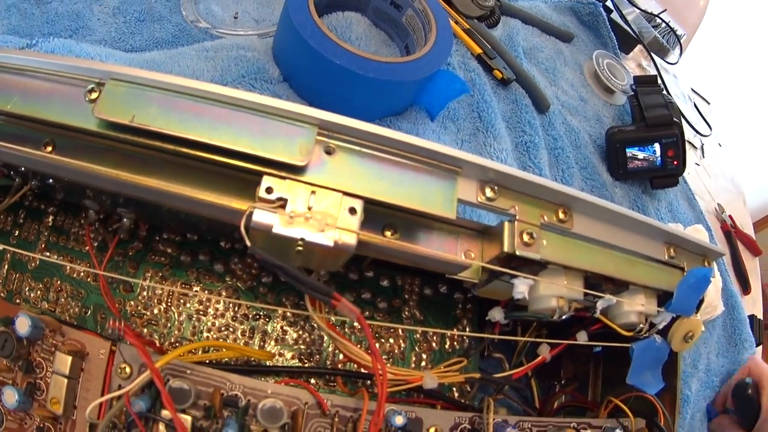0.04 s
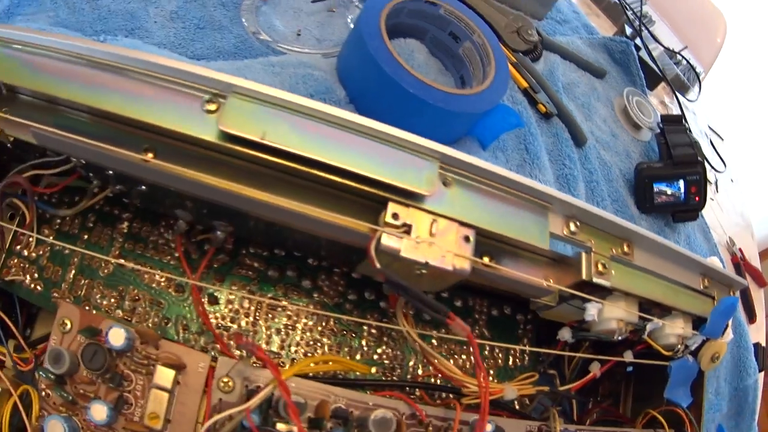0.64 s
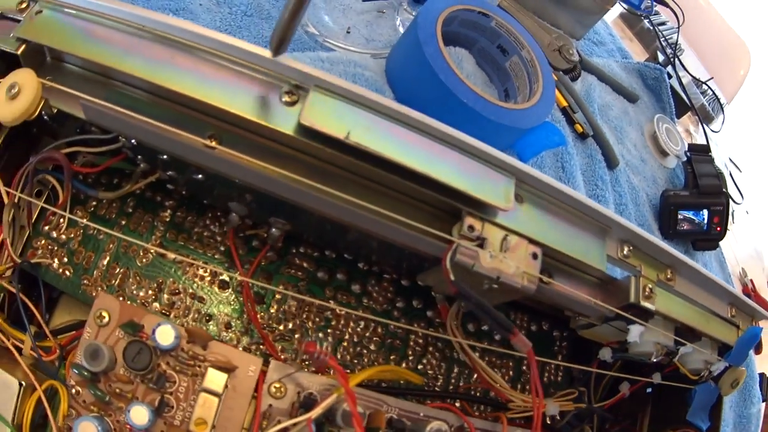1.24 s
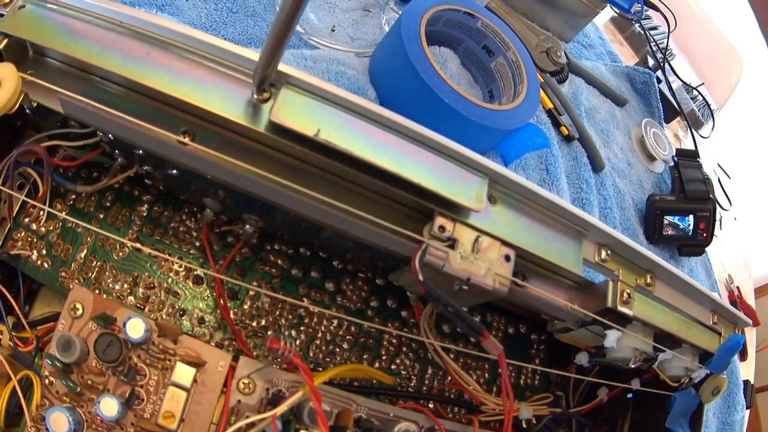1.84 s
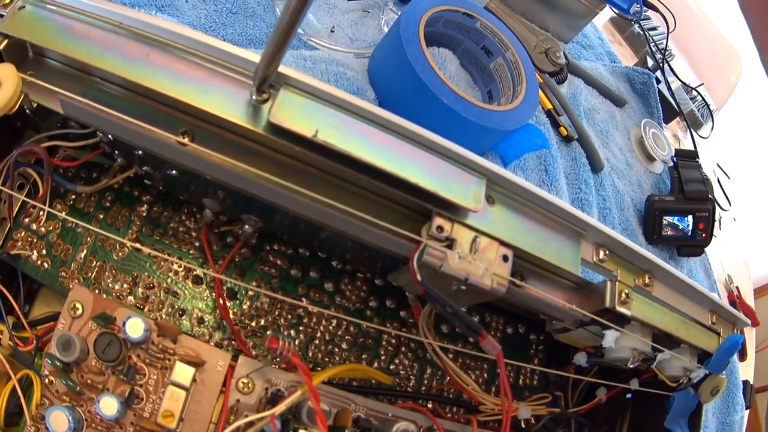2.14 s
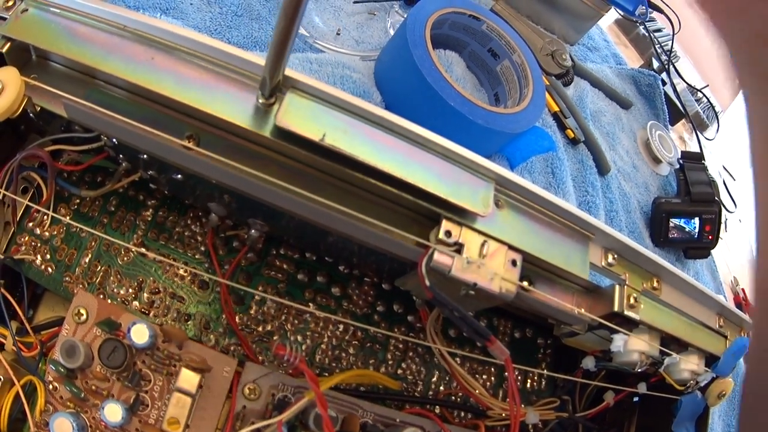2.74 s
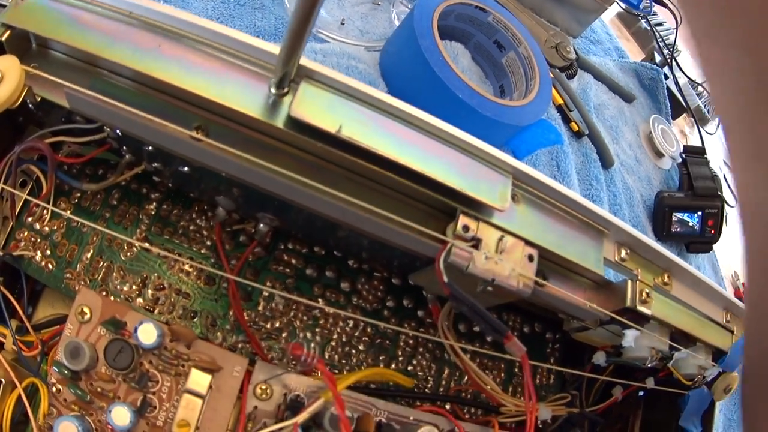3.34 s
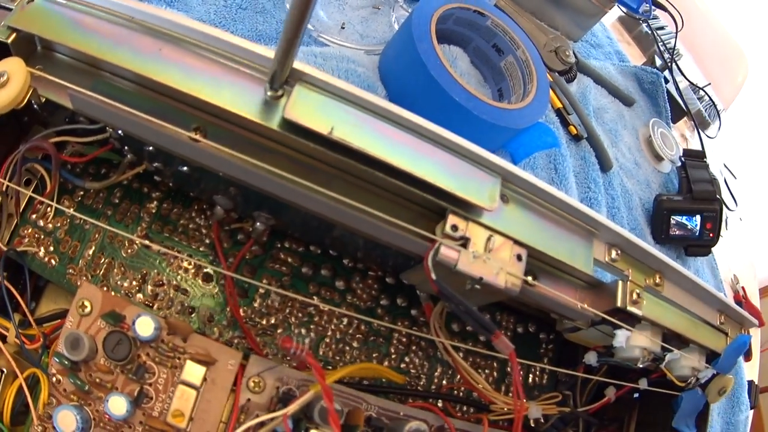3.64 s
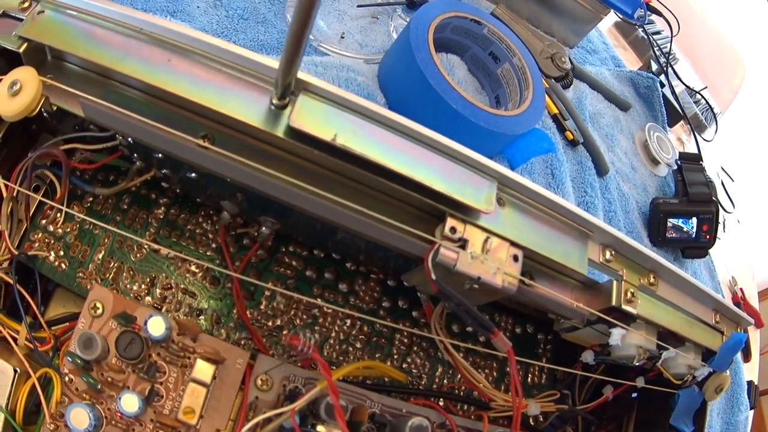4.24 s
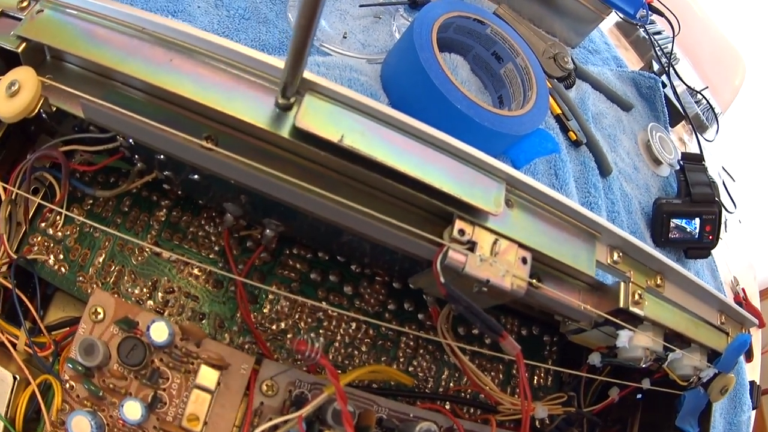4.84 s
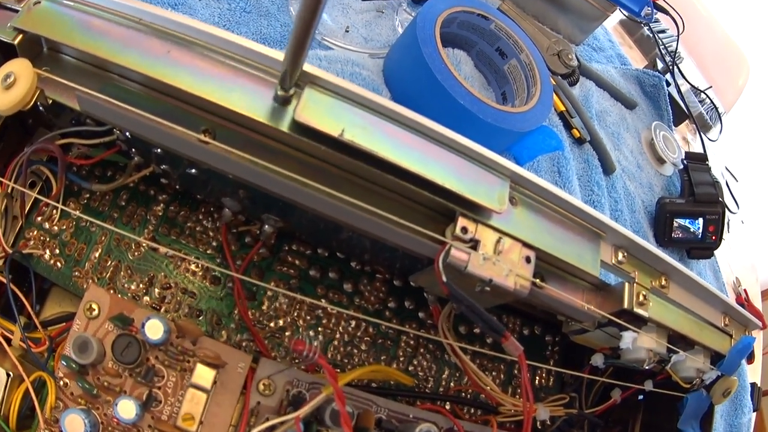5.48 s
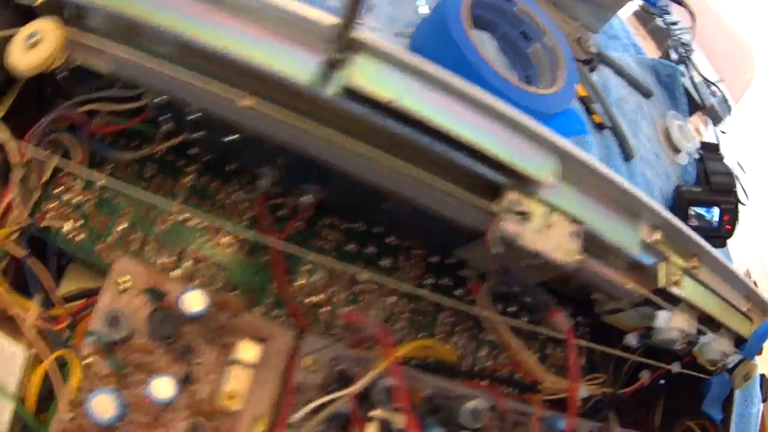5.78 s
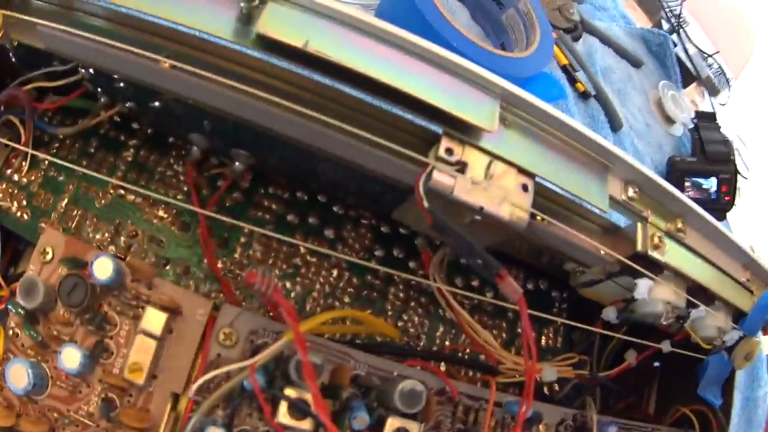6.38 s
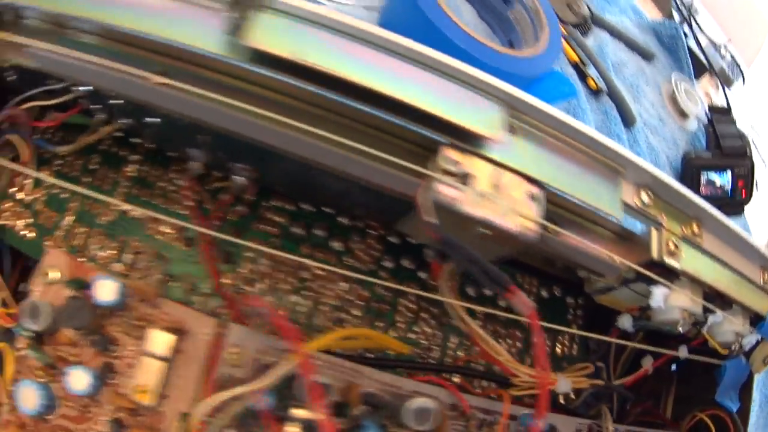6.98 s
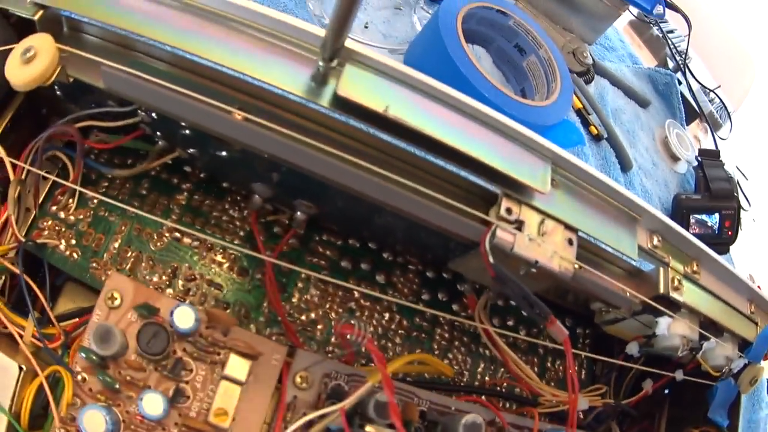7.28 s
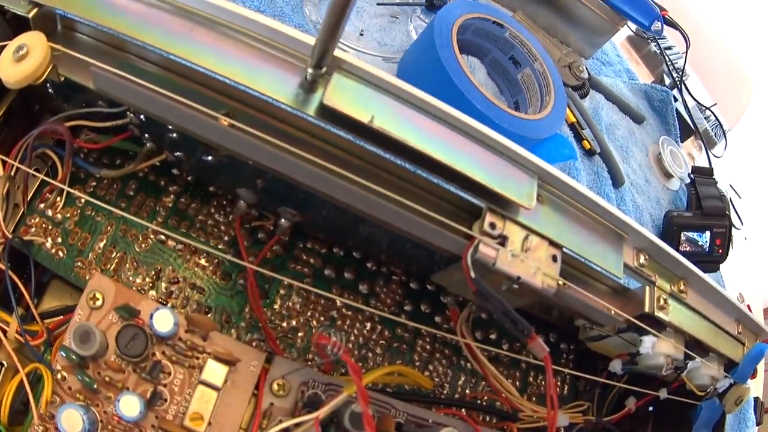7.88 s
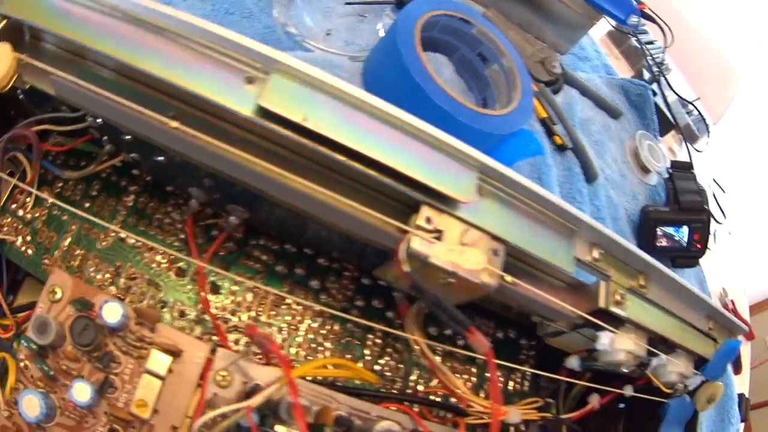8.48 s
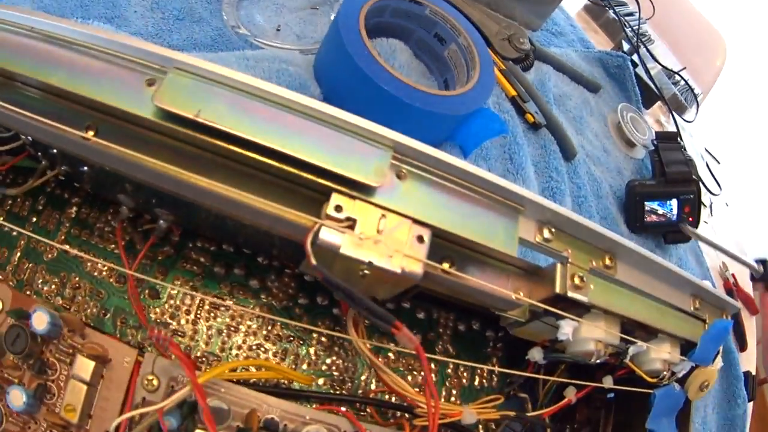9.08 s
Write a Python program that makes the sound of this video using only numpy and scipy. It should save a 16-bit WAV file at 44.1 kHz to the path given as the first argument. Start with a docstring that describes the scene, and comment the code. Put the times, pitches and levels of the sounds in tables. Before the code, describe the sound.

Scattered metal ticks and one ringing knock as a screwdriver works a screw out of a bracket, with soft microphone thumps.

```python
"""Bright snaps and skids as a screwdriver is picked up off a bench, in a small room. A knock sets an open
steel chassis ringing; close by, the tip seats in a small screw, ticks and scrapes as it turns, then slips
out. Each tap rings the bracket, flexes the front panel and leaves the steel sheet humming. The hand that
holds the microphone thumps softly on it. Behind lie room air, a low hum and a thin electrical whine."""
import sys
import numpy as np
from scipy import signal
from scipy.fft import rfft, irfft, next_fast_len
from scipy.io import wavfile
from scipy.ndimage import map_coordinates

SR = 44100
rng = np.random.default_rng(int(sys.argv[2]) if len(sys.argv) > 2 else 0)


def master_out(mix):
    """Clip the mix to full scale and print it as 16-bit PCM to the path in sys.argv[1]."""
    frames = np.transpose(np.atleast_2d(mix))
    ceiling = np.clip(frames, -1, 1)
    pcm = np.round(ceiling * 32767).astype(np.int16)
    wavfile.write(sys.argv[1], SR, pcm)


N = 406593

# resonances of the bracket: pitch_hz, width_hz, gain_db
BRACKET_MODES = [(502, 74, 3), (702, 98, -4), (795, 72, 0.5), (1207, 117, 1.5), (1630, 230, -4),
                 (2230, 280, -2), (2636, 230, -3), (2913, 73, 1), (3280, 142.5, 0), (3900, 480, -4.5),
                 (4600, 350, -4), (5130, 450, -4.5), (6300, 510, -4), (7050, 340, -4), (8160, 540, -6),
                 (10540, 866, -20.5)]
# the steel sheet's crowd of weak modes: frequency_hz, density_db
SHEET_SPECTRUM = [(120, -56), (200, -25.5), (304, -16), (398, -11.5), (511, -3.5), (647, -14), (752, -6.5),
                  (1330, -4.5), (1800, -9.5), (1990, -6.5), (2390, -26), (3520, -21), (11000, -46),
                  (14300, -81), (22000, -120)]
# how long the sheet rings: frequency_hz, t60_s
SHEET_DECAY = [(300, 0.497), (1200, 0.52), (3000, 0.47), (8000, 0.13)]
# the screw turns in its thread: start_s, length_s
SCREW_TURNS = [(4.494, 0.037), (4.558, 0.021), (4.805, 0.052), (5.084, 0.12), (5.459, 0.036), (5.813, .13),
               (5.921, 0.081), (6.243, 0.082), (6.558, 0.05), (6.89, 0.11), (7.758, .13)]


def chassis_knock(start_s=1.1282, level_db=-7.5, push_hz=1130, push_s=0.00123):
    """A short push on the panel, then the long ring of the whole chassis."""
    # strong modes of the chassis: pitch_hz, gain_db, t60_s
    chassis_modes = [(518, -10, 0.26), (520, -5, 0.25), (609.4, -15.5, 0.37), (746, -9.5, 0.6),
                     (904.6, -8, 0.34), (950, -16.5, .35), (1037, -6.5, 0.37), (1191, 3.5, .45),
                     (1300, -10, 0.34), (1357, 5, 0.28), (1380, -4, 0.7), (1397, -4.5, 0.44),
                     (1470, -4, .35), (1560, -11, .42), (1596, -9.5, 0.39), (1654, -8.5, 0.52),
                     (1930, -12.5, 0.22), (1952, -8.5, 0.37), (2140, -13, 0.42), (2972, -12.5, 0.19),
                     (3625, -19, .4), (4740, -21, 0.301)]
    t = np.arange(SR // 2) / SR
    u = t / push_s
    push = u ** 2 * np.exp(2 * (1 - u)) * np.sin(2 * np.pi * push_hz * t)
    modes = sum(amp(db - 60 * t / t60) * np.sin(2 * np.pi * (hz * t + rng.random()))
                for hz, db, t60 in chassis_modes)
    sheet = filtered(dying_noise(SHEET_DECAY), lambda hz: amp(along(SHEET_SPECTRUM, hz)))[:, :len(t)]
    sheet = spread(sheet / np.std(sheet[:, :SR // 50]), side_db=-21)
    ring = (amp(-26) * modes + amp(-21) * sheet) * (1 - np.exp(-t / .002))
    out = np.zeros((2, N))
    add(out, start_s, amp(level_db) * (push + ring))
    return out


def tip_taps(detune=0.012, vary_db=1.5, top_loss_db=10, sheet_db=-21):
    """The tip strikes the screw head: the bracket rings, the panel thuds and the sheet hums on."""
    # steel on steel: start_s, level_db, hardness_db (gain per band upwards), knock_hz, thud_db
    strikes = [(1.1285, -27, -2, 1180, -47), (1.539, -30, 4, 1200, -47.5), (1.5922, -34, -4.5, 844, -50),
               (1.598, -42.5, -9.5, 800, -44.5), (1.7763, -35, -2, 810, -47.5),
               (2.0078, -45.5, -6.5, 1130, -46.5), (2.149, -35.5, -3.5, 1160, -46),
               (2.157, -27, -1, 1240, -47), (2.178, -38.5, -1, 786, -50), (2.4, -63, -11.5, 630, -66),
               (2.4224, -55.5, -13.5, 597, -61), (2.438, -61, -19, 536, -58), (3.1193, -49, -3, 550, -40),
               (3.306, -55.5, 8, 620, -67), (3.36, -56.5, 6.5, 650, -62), (3.4205, -48.5, 0, 750, -61),
               (4.2277, -37, -1.5, 746, -43), (5.138, -60.5, -18.5, 555, -51.5), (5.8, -45, 6, 500, -47.5),
               (6.137, -49.5, -3.5, 1280, -51), (6.664, -64.5, -20, 1008, -48), (6.913, -61, -10, 960, -48),
               (7.342, -26.5, 4, 940, -41), (7.3458, -31.5, -1.5, 790, -48), (7.742, -44.5, 5.5, 840, -44),
               (7.963, -52.5, 10, 770, -70), (7.977, -54, 16, 680, -75)]
    # the front panel flexes: pitch_hz, gain_db, t60_s
    panel_modes = [(169.7, -13.5, 0.066), (221, -7, 0.12), (274.3, 2, 0.087), (325, -7.5, .09),
                   (405.3, -4, 0.16)]
    out, t = np.zeros((2, N)), np.arange(SR // 12) / SR
    for start, level_db, hardness_db, knock_hz, thud_db in strikes + thread_catches():
        low_db = level_db - hardness_db
        levels = (low_db, level_db, level_db + hardness_db - top_loss_db)
        # the pressure of the blade shifts and reweights the modes at every contact
        modes = [(hz * (1 + detune * rng.standard_normal()), width, db + vary_db * rng.standard_normal())
                 for hz, width, db in BRACKET_MODES]
        tick = contact(levels, modes, knock_hz, chatter_db=-19, hold_s=0.0023, t60_s=0.0167, span_s=0.006)
        panel = sum(amp(db - 60 * t / t60) * np.sin(2 * np.pi * hz * t * (1 + .03 * rng.standard_normal()))
                    for hz, db, t60 in panel_modes)
        thud = amp(thud_db + 2.5) * panel * (1 - t / t[-1])
        add(out, start, in_room(tick + thud, wet_db=-9, treble_db=-7))
        add(out, start, amp(low_db + sheet_db) * sheet_hum())
    return out


def contact(levels, modes, knock_hz, chatter_db, hold_s, t60_s, span_s, knock_width_hz=560):
    """Hard surfaces strike, chatter and ring the modes; levels are band rms in dB over the first span_s."""
    # low, middle and top of a blow: low_hz, high_hz
    blow_bands = [(400, 1400), (1400, 4500), (4500, 13000)]
    t = np.arange(SR // 12) / SR
    force = rng.standard_normal(len(t)) * amp(chatter_db - 60 * np.maximum(t - hold_s, 0) / t60_s)
    force[SR // 2000] += 1  # the strike itself
    ring = resonate(force, modes)
    low, middle, top = [band(ring, edges) for edges in blow_bands]
    low = resonate(low, [(knock_hz, knock_width_hz, 0)])  # the place of contact favours some low modes
    return mix_bands(levels, (low, middle, top), int(span_s * SR))


def sheet_hum(damping_db_per_s=70, corner_hz=900):
    """The low crowd of the sheet's modes, damped by the tool that leans on it."""
    ring = filtered(dying_noise(SHEET_DECAY),
                    lambda hz: amp(along(SHEET_SPECTRUM, hz)) / (1 + (hz / corner_hz) ** 2))
    ring *= amp(-damping_db_per_s * np.arange(ring.shape[1]) / SR)
    return spread(ring / np.std(ring[:, :SR // 50]), side_db=-13)


def thread_catches(mean_gap_s=.06):
    """The thread catches at random moments of a turn: rows for faint taps of the tip."""
    # one catch: level_db, hardness_db, knock_hz, thud_db
    catch = (-68, -7, 700, -56.5)
    return [(start + length * rng.random(), *catch)
            for start, length in SCREW_TURNS for _ in range(round(length / mean_gap_s))]


def tool_pickup():
    """The tool snaps against the bench, farther from the microphone and so with more room."""
    # sharp contacts: start_s, low_db, middle_db, top_db
    snaps = [(.066, -34.5, -30.5, -27), (.075, -60, -56, -50), (0.319, -35.5, -44, -30),
             (0.3224, -65, -33.5, -34), (0.3287, -30.5, -34, -32.5), (.386, -49, -42.5, -33.5)]
    # resonances of the screwdriver: pitch_hz, width_hz, gain_db
    tool_modes = [(830, 470, -15.5), (2170, 560, -7.5), (5200, 3300, -5), (7880, 1380, 1.5)]
    out = np.zeros((2, N))
    for start, *levels in snaps:
        snap = contact(levels, tool_modes, knock_hz=860, knock_width_hz=2200,
                       chatter_db=-18.5, hold_s=0.0012, t60_s=0.011, span_s=0.0041)
        add(out, start, in_room(snap, wet_db=-6, treble_db=-2))
    return out


def scrapes(grain_db=3, slip_share=0.18, skid_flex_db=-9.5):
    """Each skid or turn is a swell of tiny slips of uneven size that drive the bracket."""
    # the steel shaft skids: start_s, length_s, rub_db, grit_over_rub_db
    shaft_skids = [(0.01, 0.072, -65, 10), (0.14, 0.058, -56, 4), (0.303, 0.019, -58, 8.5),
                   (1.757, 0.025, -44.5, -18), (2.133, .029, -39.5, -13), (2.406, .038, -59, -9),
                   (3.398, .042, -60, 3.5), (3.737, 0.092, -58.5, -5), (7.961, 0.036, -61, 7.5)]
    # every turn takes the same effort: flex_db, rub_db, grit_db
    turn_levels = (-57, -65, -78)
    # flexing sheet, rub and grit: low_hz, high_hz
    scrape_bands = [(235, 316), (500, 2750), (2000, 22000)]
    skids = [(start, length, db + skid_flex_db, db, db + grit_db)
             for start, length, db, grit_db in shaft_skids]
    turns = [(start, length, *turn_levels) for start, length in SCREW_TURNS]
    out = np.zeros((2, N))
    for start, length, *levels in skids + turns:
        n = int(length * SR)
        slips = rng.standard_normal(n) * amp(grain_db * np.minimum(rng.exponential(size=n), 4))
        slips *= rng.random(n) < slip_share
        swell = np.sin(np.pi * np.linspace(0, 1, n) ** 1.22)
        rub = resonate(np.pad(slips * swell, (0, SR // 20)), BRACKET_MODES)
        stroke = mix_bands(levels, [band(rub, edges) for edges in scrape_bands], n)
        add(out, start, in_room(stroke, wet_db=-5.5, treble_db=-10))
    return out


def handling(rub_db=-15):
    """The grip shifts on the microphone: a few soft low cycles with a dull rub."""
    # thumps of the hand: start_s, level_db, length_s
    thumps = [(0.503, -41, 0.033), (2.89, -30.5, 0.061), (3.014, -37.5, 0.06), (3.106, -38, 0.059),
              (3.343, -35, 0.06), (4.155, -36, 0.073), (5.645, -34, 0.054), (5.914, -31.5, 0.063),
              (6.088, -34.5, 0.036), (6.142, -21.5, 0.017), (6.233, -33, 0.046), (6.567, -37, 0.051),
              (6.764, -36, 0.082)]
    out, t = np.zeros(N), np.arange(SR // 4) / SR
    for start, db, length in thumps:
        hz = 54.7 * (0.075 / length) ** 0.36  # a shorter thump is higher
        u = t / (0.46 * length)
        swell = u ** 3 * np.exp(3 * (1 - u))
        sway = np.sin(2 * np.pi * hz * t * (1.1 - 0.088 * np.minimum(u, 4)))
        rub = unit(band(rng.standard_normal(len(t)), (35, 170), order=2))
        add(out, start, amp(db) * swell * (sway + amp(rub_db) * rub))
    return out


def electrics(hum_gain_db=-0.5, hum_waver_db=1, whistle_gain_db=4, buzz_gain_db=1):
    """A low wavering hum, a thin whistle and a high buzz whose lines are spaced by mains ripple."""
    # the hum swells and fades: time_s, level_db
    hum_levels = [(0.0, -54), (0.56, -66.5), (1.56, -58), (2.2, -56.5), (3.24, -65), (3.4, -54.1),
                  (4.0, -53.5), (4.68, -64.5), (5.12, -49), (5.36, -62.5), (6.72, -52), (7.04, -65),
                  (7.2, -57), (8.52, -61.5), (8.88, -48.5), (9.2, -61)]
    # the whistle comes and goes: time_s, level_db
    whistle_levels = [(0.0, -68), (0.64, -81), (0.88, -87.5), (2.68, -78), (3.24, -92.5), (4.16, -82),
                      (5.64, -90.0), (5.92, -82), (6.48, -89.6), (6.64, -80), (7.04, -86), (9.2, -81)]
    # the buzz drifts: time_s, level_db
    buzz_levels = [(0.5, -79), (1.37, -82), (4.12, -79), (5.23, -84), (6.06, -78), (8.15, -78.5),
                   (8.49, -84), (9.22, -81.5)]
    # lines of the buzz: pitch_hz, gain_db
    buzz_lines = [(6720, -13), (6961, -6.5), (7080, -10.5), (7200, -13), (7321, -12.5), (7440, -4.5),
                  (7558, -5), (7680, -11.5), (8160, -13)]
    hum_db = over_time(hum_levels) + hum_gain_db + hum_waver_db * wobble(3.8)
    hum = amp(hum_db) * tone(102.2, waver_rad=.7) + amp(-66) * tone(166, waver_rad=0.89)
    whistle = amp(over_time(whistle_levels) + whistle_gain_db) * tone(6842, waver_rad=0.65)
    buzz = sum(amp(db + 2.6 * wobble(2.033)) * tone(hz, waver_rad=0.91) for hz, db in buzz_lines)
    return hum + whistle + amp(over_time(buzz_levels) + buzz_gain_db) * buzz


def room_tone(rumble_db=-53.5, drift_db=0.2, hiss_db=-66, rustle_db=-62.5, rustle_s=0.43, fade_s=0.18):
    """Low drifting rumble near the centre, and a wide soft hiss that is stronger during the pick-up."""
    # the air of the room: frequency_hz, density_db
    air_spectrum = [(12, -45), (20, -17), (43, 1.5), (71, -6), (106, -6), (130, -10.5), (165, -10.5),
                    (194, -12), (385, -15), (451, -23.5), (501, -23), (1140, -30), (6320, -41.5),
                    (6840, -43), (11000, -51), (14300, -97), (22000, -120)]
    # its stereo width: frequency_hz, side_over_middle_db
    air_width = [(60, -22), (110, -19), (190, -16.5), (350, -9.5), (620, -1.5), (1110, 1), (2000, 2),
                 (3570, -0.5), (6400, -2.5), (11000, -5.5)]
    air = filtered(rng.standard_normal((2, N)),
                   lambda hz: amp(along(air_spectrum, hz) + np.array([0 * hz, along(air_width, hz)])))
    low = filtered(air, lambda hz: 1 / (1 + (hz / 550) ** 4))
    high = air - low
    rumble = amp(rumble_db + drift_db * wobble(1.48)) * low / np.std(low[0])
    rustle = amp(rustle_db) * np.clip(1 - (np.arange(N) / SR - rustle_s) / fade_s, 0, 1)
    hiss = np.hypot(amp(hiss_db), rustle) * high / np.std(band(high[0], (900, 6000)))
    return spread(rumble + hiss, side_db=0)


def in_room(x, wet_db, treble_db):
    """A near sound and the small room's diffuse answer, which is fullest in the low middle."""
    # reverberation: frequency_hz, t60_s
    room_decay = [(200, .35), (600, 0.33), (2000, 0.32), (8000, 0.28)]
    colour = [(300, 0.99), (520, 2), (1200, -3), (2500, treble_db)]  # frequency_hz, gain_db
    tail = filtered(dying_noise(room_decay), lambda hz: amp(along(colour, hz)))
    tail = spread(tail, side_db=-8) * amp(wet_db) / np.sqrt(SR / 40)
    response = np.pad(tail, ((0, 0), (SR // 200, 0)))
    response[:, 0] = 1  # the direct sound comes 5 ms ahead
    return signal.fftconvolve(x[None], response, axes=1)


def amp(db):
    return 10 ** (np.asarray(db) / 20)


def unit(x):
    return x / np.sqrt(np.mean(x ** 2) + 1e-20)


def along(points, hz):
    """Interpolate (frequency_hz, value) points on a log axis."""
    freqs, values = np.transpose(points)
    return np.interp(np.log(hz + 1), np.log(freqs + 1), values)


def over_time(points):
    """Interpolate (time_s, value) points at every sample."""
    return np.interp(np.arange(N) / SR, *np.transpose(points))


def wobble(rate):
    """A smooth random curve, rate knots a second."""
    return map_coordinates(rng.standard_normal(int(N * rate / SR) + 4), [np.arange(N) * rate / SR])


def tone(hz, waver_rad):
    """A sine of rms 1 whose phase wanders."""
    return unit(np.sin(2 * np.pi * hz * np.arange(N) / SR + waver_rad * wobble(4.3)))


def dying_noise(t60s):
    """Two unrelated tails in which each frequency dies at its own speed."""
    hz, t, spectra = signal.stft(rng.standard_normal((2, SR // 2)), SR, nperseg=256)
    return signal.istft(spectra * amp(-60 * t / along(t60s, hz)[:, None]), SR, nperseg=256)[1]


def filtered(x, response):
    """x through a complex response of frequency."""
    n = x.shape[-1]
    size = next_fast_len(n + SR // 8)
    return irfft(rfft(x, size) * response(np.fft.rfftfreq(size, 1 / SR)), size)[..., :n]


def resonate(x, modes):
    """x through (pitch_hz, width_hz, gain_db) resonances of alternating sign."""
    return filtered(x, lambda f: sum(
        (-1) ** k * amp(db) * 1j * f * width / (hz * hz - f * f + 1j * f * width)
        for k, (hz, width, db) in enumerate(modes)))


def band(x, edges, order=3):
    """Causal band-pass."""
    return signal.sosfilt(signal.butter(order, edges, 'band', fs=SR, output='sos'), x)


def mix_bands(levels, parts, n):
    """Sum the parts, each set to its rms level in dB over the first n samples."""
    return sum(amp(db) * part / np.std(part[:n]) for db, part in zip(levels, parts))


def add(track, start_s, x):
    """Mix x into the track."""
    i = max(round(start_s * SR), 0)
    track[..., i:i + x.shape[-1]] += x[..., :N - i]


def spread(pair, side_db):
    """Left and right from a middle and a side signal."""
    return pair[0] + amp(side_db) * np.array([pair[1], -pair[1]])


def scene():
    """The work at the bench, widened by a small phase lead of the left channel, over the background."""
    # phase of the left channel over the right: frequency_hz, lead_rad
    left_lead = [(0, 0), (1210, 0.6), (7060, 0.14), (11600, 0.36)]
    work = tool_pickup() + tip_taps() + chassis_knock() + scrapes()
    work = filtered(work, lambda hz: np.exp(.5j * along(left_lead, hz) * np.array([[1], [-1]])))
    return work + handling() + room_tone() + electrics()


def record(dry):
    """The sound is cut off steeply above about 11 kHz."""
    limit_hz = 11200
    return filtered(dry, lambda hz: 1 / np.sqrt(1 + (hz / limit_hz) ** 100))


dry = scene()
out = record(dry)
master_out(out)
```